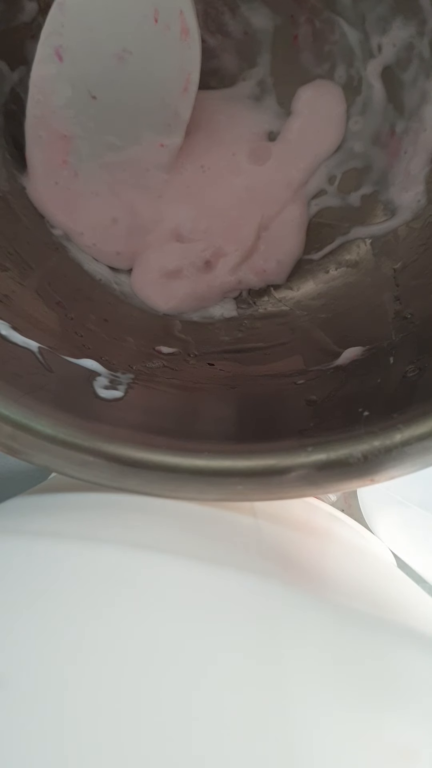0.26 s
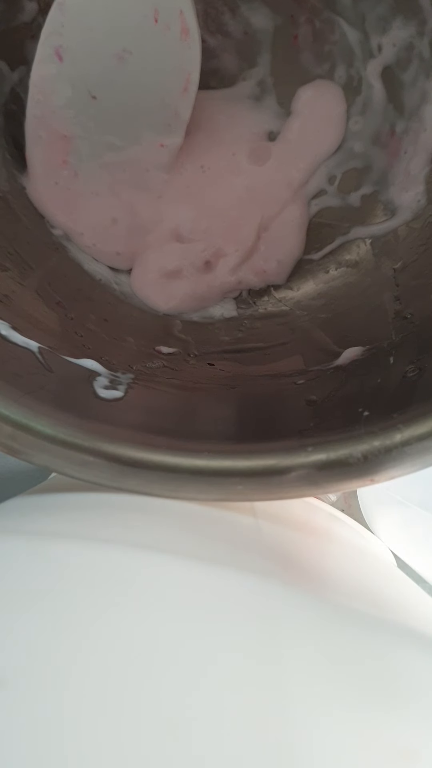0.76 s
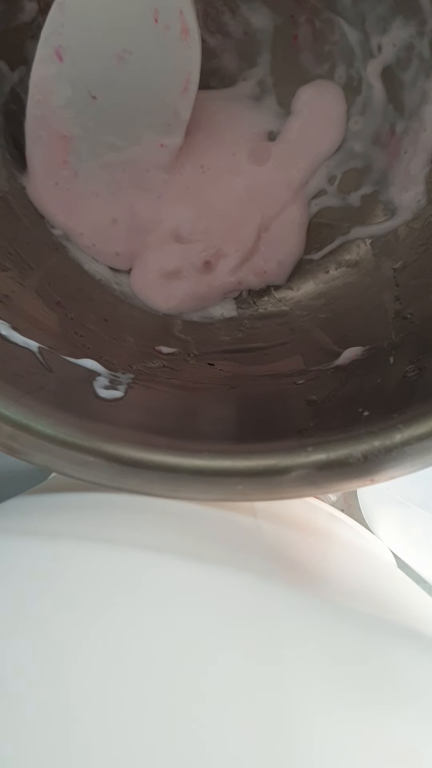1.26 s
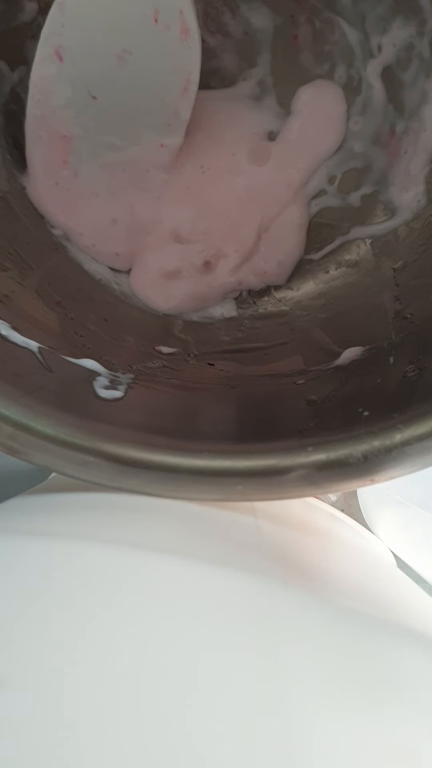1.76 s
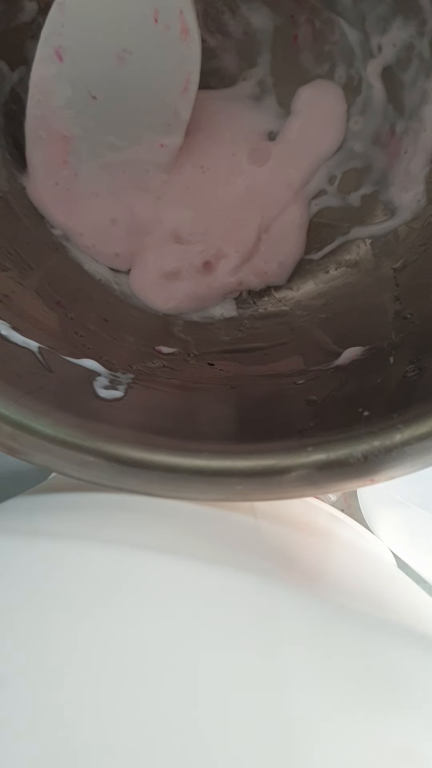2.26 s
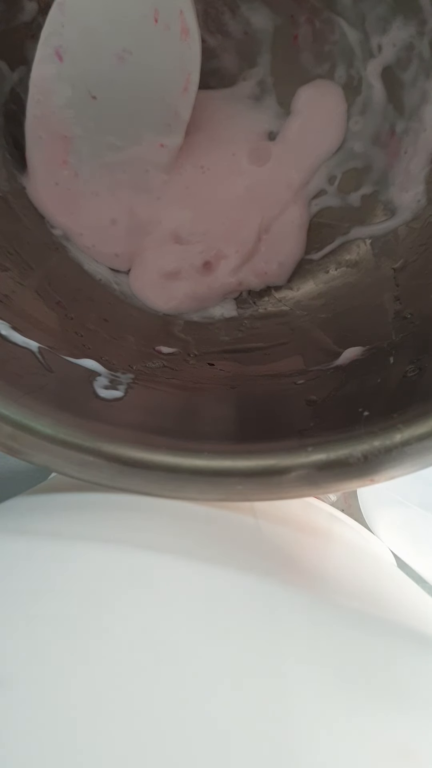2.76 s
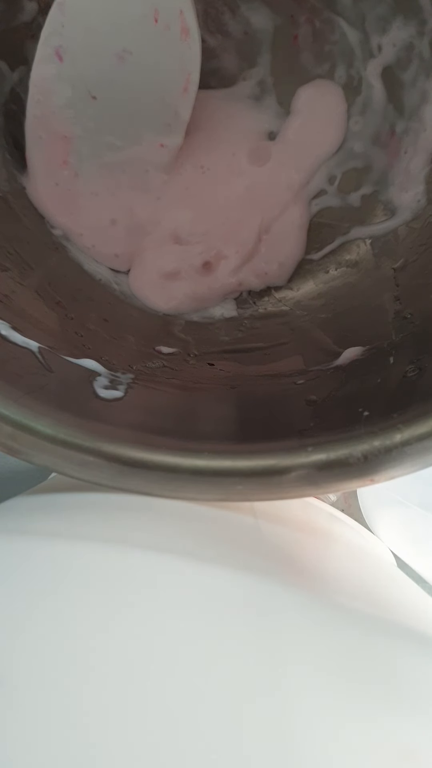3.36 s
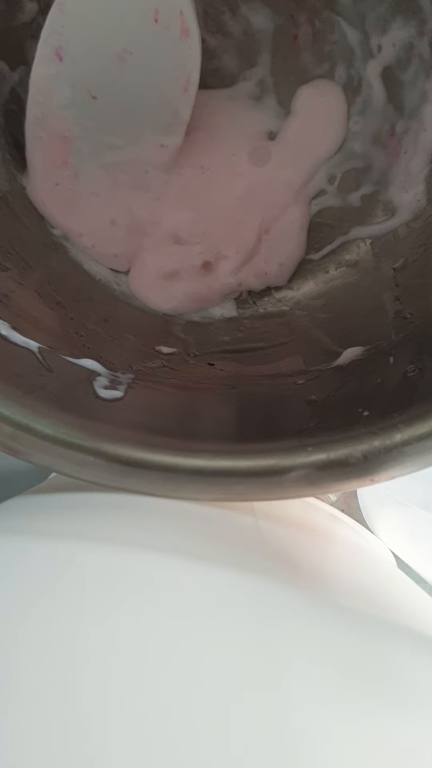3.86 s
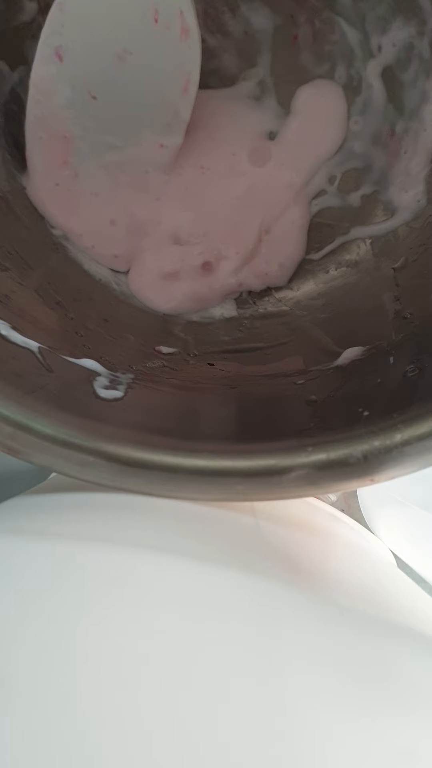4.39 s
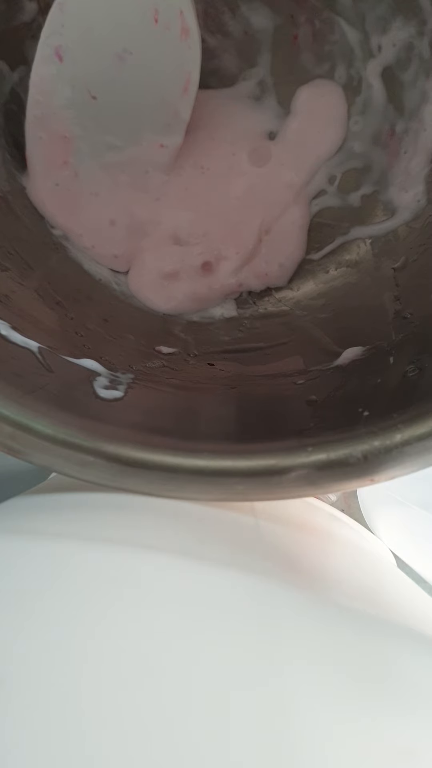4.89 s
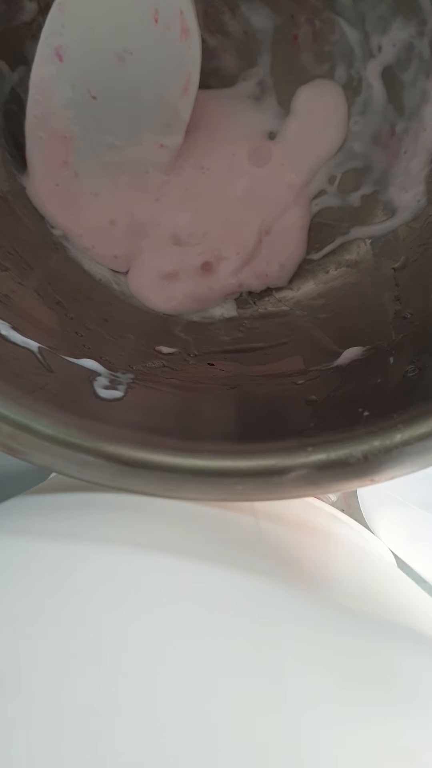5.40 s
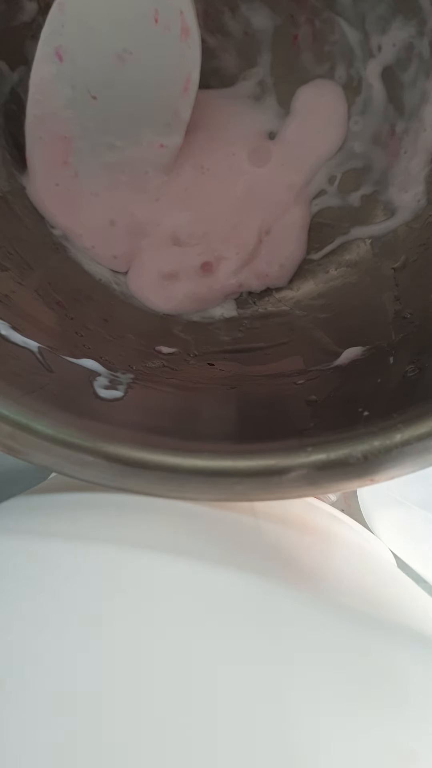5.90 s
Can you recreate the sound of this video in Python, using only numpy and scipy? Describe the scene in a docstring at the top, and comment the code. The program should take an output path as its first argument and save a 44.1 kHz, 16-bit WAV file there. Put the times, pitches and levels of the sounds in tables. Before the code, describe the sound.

Close, bright plastic crinkling and sharp clicks as light containers are handled and bumped on a table in a small, quietly humming room.

```python
"""Rummaging among plastic containers

Hands rummage among small plastic containers on a table, close to the left of a pair of microphones.
Filtered noise bursts make the stiff snaps and hollow knocks, and showers of noise grains the dense fine
crackle and dull shuffle; damped sines make the thumps of the table top. A small room answers as decaying
sparse reflections, and an appliance hums low behind it all as shaped noise with thin wavering tones."""
import sys
import numpy as np
from scipy import signal
from scipy.fft import rfft, irfft, next_fast_len
from scipy.io import wavfile
from scipy.ndimage import uniform_filter1d

SR = 44100
rng = np.random.default_rng(int(sys.argv[2]) if len(sys.argv) > 2 else 0)


def materialize(psi):
    """Save the field psi as 16-bit PCM at rate SR to the path in sys.argv[1].

    A 1-D psi becomes a single channel; in a 2-D psi each row is a channel.
    """
    bounded = np.clip(np.atleast_2d(psi).T, -1, 1)
    quanta = np.round(bounded * 32767).astype(np.int16)
    wavfile.write(sys.argv[1], SR, quanta)


N = 270774  # length [samples]


def gain_of(db):
    """Level law: 20 dB is a tenfold amplitude."""
    return 10 ** (np.asarray(db) / 20)


def evened(x):
    """Power normalization: scales to rms 1."""
    return x / np.sqrt(np.mean(x ** 2) + 1e-20)


def read(points, hz):
    """Interpolation of a table along a logarithmic frequency axis."""
    f, value = np.transpose(points)
    return np.interp(np.log(hz + 1), np.log(f + 1), value)


def colour(x, db_at):
    """Linear filtering: multiplies the spectrum by a gain in dB given as a function of frequency."""
    size = next_fast_len(x.shape[-1])
    gain = gain_of(db_at(np.fft.rfftfreq(size, 1 / SR)))
    return irfft(rfft(x, size) * gain, size)[..., :x.shape[-1]]


def add(mix, s, sound):
    """Superposition: mixes a two-channel sound in at time s."""
    part = mix[:, max(round(s * SR), 0):][:, :sound.shape[1]]
    part += sound[:, :part.shape[1]]


def burst(noise, rise_s, fall_s):
    """Impulsive excitation: noise under a quick rise and an exponential fall."""
    t = np.arange(noise.shape[-1]) / SR
    return noise * (1 - np.exp(-t / rise_s)) * np.exp(-t / fall_s)


def pair(noise, alike):
    """Partial coherence: each microphone faces another side of the source, so the signals agree in part."""
    alike = np.clip(alike, 0, 1)
    right = alike * noise[0] + np.sqrt(1 - alike ** 2) * noise[1]
    return np.array([noise[0], right])


def grains(per_s, spread_db, fall_s, alike):
    """Shot noise: many tiny slips of very unequal size, each a short puff of noise."""
    size_db = spread_db * np.minimum(rng.exponential(1, N), 3.2)
    size = gain_of(size_db) * (rng.random(N) < per_s / SR)
    power = signal.oaconvolve(size ** 2, burst(np.ones(400), 0.00007, fall_s))[:N]
    power /= uniform_filter1d(power, 4000) + 1e-9  # the hands set the level, chance only the fine pattern
    return np.sqrt(abs(power)) * pair(rng.standard_normal((2, N)), alike)


def room_tone():
    """Stationary noise of given spectrum and coherence: low rumble, thin wavering tones and faint hiss."""
    # spectrum of the noise before levelling: (frequency [Hz], gain [dB])
    air = [(15, -32), (30, -3), (65, 13.5), (100, 13), (150, 13), (230, -4), (570, -19.5), (1300, -44),
           (2500, -39), (4500, -9), (7500, -19.5), (16000, -56)]
    # left-right likeness of the noise: (frequency [Hz], coherence [0-1])
    likeness = [(60, .96), (150, .97), (300, .8), (700, .3), (1500, .05)]
    # faint steady tones: (mean frequency [Hz], mean level [dB rms])
    hum = [(118.4, -70), (468.3, -91.5), (780.6, -83.5)]
    air_db = -56  # rms level of the noise
    frames, hz = N // 512 + 5, np.fft.rfftfreq(2048, 1 / SR)
    a, b, c, d = rng.standard_normal((frames, 1025, 4)).T
    same = np.clip(read(likeness, hz), 0, 1)[:, None]
    left = a + 1j * b
    right = same * left + np.sqrt(1 - same ** 2) * (c + 1j * d)
    spectrum = np.array([left, right]) * gain_of(read(air, hz))[:, None]
    noise = signal.istft(spectrum, nperseg=2048, noverlap=1536)[1][:, :N]
    out = gain_of(air_db) * evened(noise)
    for f, db in hum:
        waver = evened(uniform_filter1d(rng.standard_normal(N), 6000))  # moves level and pitch together
        phase = 2 * np.pi * np.cumsum(f * (1 + 0.0042 * waver)) / SR
        out = out + np.sqrt(2) * gain_of(db + 3.7 * waver) * np.sin(phase)
    return out


def room(x):
    """Reverberation: sparse reflections of random sign, each band dying at its own speed."""
    # reverberation time: (frequency [Hz], time to fall by 60 dB [s])
    decay = [(300, 0.56), (1500, 0.3), (4000, 0.34), (10000, 0.22)]
    out = np.zeros_like(x)
    # the hands move about, so the pattern of reflections keeps changing between three
    turn = 2 * np.pi * 2.3 * np.arange(N) / SR
    for k in range(3):
        taps = np.zeros((2, SR // 2))
        at = np.arange(90, SR // 2 - 12, 12)
        at = at + rng.integers(0, 12, (2, len(at)))
        np.put_along_axis(taps, at, rng.choice([-1., 1.], at.shape), 1)
        hz, t, z = signal.stft(taps, SR, nperseg=128)
        swell = 1 - np.exp(-t / 0.0014)  # the walls are some way off
        fall = gain_of(-60 * t / read(decay, hz)[:, None])
        tail = signal.istft(z * swell * fall, SR, nperseg=128)[1]
        tail /= np.linalg.norm(tail, axis=1)[:, None]
        share = np.sqrt(2 / 3) * np.cos(turn + k * np.pi / 3)  # the squared shares sum to 1
        out += signal.fftconvolve(x * share, tail, axes=1)[:, :N]
    return out


def hands():
    """Control envelope: level of the handling in dB, linear between points, at every sample."""
    # handling: (time [s], level of the body of the crackle [dB])
    handling = [(0.0, -54), (0.35, -67), (0.52, -50), (0.74, -68), (0.971, -65.5), (1.028, -48),
                (1.451, -67.5), (1.68, -45.5), (1.79, -55), (1.88, -39), (2.17, -73.5), (2.36, -50),
                (2.48, -60), (2.689, -42), (2.93, -45.5), (2.959, -37.5), (3.072, -58), (3.219, -40),
                (3.4, -48.5), (3.51, -45), (3.68, -56), (3.79, -58), (3.849, -37), (3.99, -54.5),
                (4.021, -46), (4.461, -39.5), (4.53, -55), (4.62, -46.5), (4.83, -69.5), (5.02, -46.5),
                (5.09, -38), (5.29, -38), (5.411, -54.5), (5.53, -41), (5.94, -48), (6.02, -50),
                (6.14, -48)]
    return np.interp(np.arange(N) / SR, *np.transpose(handling))


def shuffle():
    """Shot noise of soft bumps inside the pile, louder as the hands dig in."""
    # dull knocking of the pile before levelling: (frequency [Hz], gain [dB])
    dullness = [(80, -64), (200, 4.5), (400, 7.5), (800, 5), (1500, -1), (2300, -7)]
    base_db, growth = -55, 0.84  # level at a handling of -45 dB, and dB gained per dB of handling
    bumps = grains(per_s=140.0, spread_db=1.5, fall_s=0.0023, alike=0.72)
    level_db = base_db + growth * (uniform_filter1d(hands(), 3000) + 45)
    return gain_of(level_db) * evened(colour(bumps, lambda hz: read(dullness, hz)))


def thumps():
    """Damped modes: the table top answers a landing with a low ring and weaker overtones."""
    # containers landing on the table: (time [s], level of the lowest mode before rise and decay [dB], pitch [Hz])
    landings = [(1.881, -37, 123), (2.358, -40, 153), (2.889, -37, 146.4), (2.929, -39, 144),
                (4.277, -34, 145), (4.365, -27, 117), (4.388, -25.5, 137), (4.44, -32, 120),
                (4.957, -43, 129), (5.101, -34.5, 125), (5.158, -38, 132), (5.236, -33.5, 121),
                (5.409, -30, 155)]
    t60_s = 0.12
    out, t = np.zeros((2, N)), np.arange(SR // 4) / SR
    for s, db, hz in landings:
        ring = np.sin(2 * np.pi * hz * t)
        ring += 0.44 * np.sin(2 * np.pi * 1.9 * hz * t)
        ring += 0.25 * np.sin(2 * np.pi * 1.216 * hz * t)
        envelope = gain_of(db - 60 * t / t60_s) * (1 - np.exp(-t / 0.0098))
        add(out, s - .004, np.tile(envelope * ring, (2, 1)))
    return out


def knocks():
    """Cavity resonance: each bump rings the air and walls of a container for a few cycles."""
    # hollow containers bumping one another: (time [s], peak level [dB], pitch [Hz])
    bumps = [(0.774, -43, 580), (1.034, -43.5, 437), (1.113, -49, 674), (1.152, -39.5, 540),
             (1.667, -38, 637), (1.875, -32.5, 517), (2.351, -40.5, 380), (2.736, -62, 430),
             (3.141, -37, 935), (3.474, -44, 850), (4.008, -40, 829), (4.187, -41.5, 400),
             (4.233, -45, 345), (4.281, -42.5, 328), (4.399, -37, 403), (4.479, -35, 630),
             (5.152, -35, 775), (6.064, -40, 610)]
    out = np.zeros((2, N))
    for (s, db, hz), noise in zip(bumps, rng.standard_normal((len(bumps), 2, 1500))):
        hollow = signal.iirpeak(hz, .9, SR)
        blow = burst(pair(noise, 0.75), 0.00073, 0.006)
        ring = signal.lfilter(*hollow, signal.lfilter(*hollow, blow))
        add(out, s - .001, gain_of(db) * ring / abs(ring).max(1)[:, None])
    return out


def crumples():
    """Amplitude envelope: each squeeze swells and fades as a smooth squared-cosine arch."""
    # thin plastic squeezed for a moment: (middle [s], length [s], peak of the arch [dB])
    squeezes = [(0.524, .08, -53), (1.132, 0.045, -37), (1.299, 0.049, -36.5), (1.681, 0.1, -37),
                (1.878, 0.2, -37.5), (2.682, 0.073, -48), (3.223, 0.059, -32.5), (3.504, .07, -40),
                (3.92, .1, -31.5), (5.058, 0.11, -37), (5.32, 0.11, -35), (5.524, 0.11, -36)]
    middle, length, db = np.transpose(squeezes)[..., None]
    t = np.arange(0, N / SR, .002)
    arches = gain_of(db) * np.cos(np.pi * np.clip((t - middle) / length, -.5, .5)) ** 2
    return np.interp(np.arange(N) / SR, t, arches.sum(0))


def crackle():
    """Stick-slip shot noise of creasing plastic: harder handling packs the slips closer."""
    # spectrum of the crinkle before levelling: (frequency [Hz], gain [dB])
    crinkle = [(200, -31), (900, -12), (1300, -6.5), (2000, -2), (2500, 1), (7200, -2), (9100, -7),
               (12000, -4.5), (15200, -6), (16500, -52)]
    crisp_db, crisp_growth = -42, 0.67  # level at a handling of -44.5 dB, and dB gained per dB of handling
    per_s = 600. * gain_of(.8 * (hands() + 45.5))
    slips = grains(per_s, spread_db=6.5, fall_s=0.0016, alike=0.05)
    fine = colour(slips, lambda hz: read(crinkle, hz))
    crisp = colour(fine, lambda hz: read([(5500, -12.5), (9000, 2.5)], hz))
    steady = gain_of(crisp_db + crisp_growth * (hands() + 44.5))
    crisp_gain = np.hypot(steady, crumples())  # the crisp top flares in crumples
    return gain_of(hands()) * evened(fine - crisp) + crisp_gain * evened(crisp)


def small_snaps():
    """Random point process: chance snaps, more of them and louder where the handling is harder."""
    count, low_hz, high_hz = 70, 2380, 7000
    ring_above_db, edge_above_db, scatter_db = 17.5, 10.5, 5  # peaks above the handling level, and spread
    when, high, a, b = rng.random((count, 4)).T
    busy = np.cumsum(gain_of(0.6 * hands()))
    at = np.searchsorted(busy, when * busy[-1]).clip(0, N - 1)
    ring_db = hands()[at] + ring_above_db + scatter_db * (2 * a - 1)
    edge_db = hands()[at] + edge_above_db + scatter_db * (2 * b - 1)
    return list(zip(at / SR, ring_db, low_hz * (high_hz / low_hz) ** high, edge_db))


def snaps():
    """Buckling: a millisecond of slips rings the panel, and the crease adds a sharp edge."""
    # clear snaps, peaks before panning:
    # (time [s], panel ring peak [dB], panel pitch [Hz], sharp edge peak [dB])
    clear = [(0.0472, -23.5, 4060, -16), (0.1105, -40, 6980, -20), (0.116, -17.5, 5400, -20),
             (0.1758, -21.5, 3060, -26), (0.2391, -19, 5900, -29), (0.3224, -20, 3970, -40),
             (0.3686, -28, 3450, -30), (0.3882, -31, 5210, -23.5), (0.44, -43, 3090, -36),
             (0.4566, -24, 5000, -21), (0.5001, -32, 4000, -17), (0.5245, -24, 3920, -12.5),
             (0.5474, -23.5, 5340, -18), (0.5796, -23.5, 6550, -19), (0.6495, -24, 4600, -34),
             (0.7514, -22.5, 6550, -20), (0.7762, -20, 3700, -9), (0.8259, -15.5, 2830, -17),
             (0.8397, -21.5, 3700, -16), (0.9773, -28, 3770, -42), (1.0116, -19, 4470, -12.5),
             (1.0345, -15, 5530, -14), (1.1159, -33, 6980, -12.5), (1.1885, -25.5, 2410, -15),
             (1.2123, -23, 3750, -30), (1.2331, -24.5, 3190, -30), (1.2459, -22.5, 6420, -21),
             (1.2762, -23, 4310, -15), (1.2918, -18, 5200, -22), (1.3015, -25, 6980, -23),
             (1.3591, -28.5, 3240, -17.5), (1.4656, -15.5, 5500, -21.5), (1.4861, -20.5, 3130, -22),
             (1.5158, -19.5, 5160, -13), (1.5662, -21.5, 3550, -25), (1.5934, -20, 4500, -19),
             (1.5995, -30, 5000, -15), (1.6262, -27, 3250, -17), (1.6733, -17.5, 2720, -21),
             (1.7246, -23.5, 5700, -30), (1.7697, -27.5, 2870, -31), (1.8103, -19.5, 5600, -13.5),
             (1.8335, -20, 3420, -9), (1.8765, -23.5, 2500, -5.5), (1.8931, -16.5, 6800, -25),
             (1.9232, -24, 4950, -11), (2.0126, -34.5, 3490, -21), (2.0479, -31.5, 3100, -29),
             (2.2137, -34, 6030, -40), (2.2356, -30, 6980, -29), (2.2693, -29, 6900, -23),
             (2.3536, -18, 2930, -13.5), (2.4196, -24, 5300, -22), (2.4865, -27, 5100, -20),
             (2.5492, -21.5, 3440, -12), (2.599, -23, 6980, -18), (2.6302, -17, 6980, -17),
             (2.6756, -22, 4520, -9), (2.6903, -16.5, 5030, -11), (2.7689, -26, 4820, -13.5),
             (2.8073, -17, 7000, -17), (2.8593, -18, 5500, -12.5), (2.8708, -22, 2350, -22),
             (2.8817, -22, 5500, -12), (2.9393, -22, 6980, -11.5), (3.0381, -25.5, 5300, -24),
             (3.0946, -24, 5380, -10), (3.1074, -22, 3280, -31), (3.1429, -28, 1900, -37),
             (3.2066, -12.5, 3830, -12), (3.3416, -24.5, 4390, -27), (3.4316, -23, 6900, -12.5),
             (3.4899, -26.5, 2110, -17), (3.5016, -22, 4350, -13.5), (3.5249, -21, 4230, -12.5),
             (3.5738, -46, 3400, -17), (3.5869, -20, 3620, -15), (3.7015, -20.5, 6800, -23),
             (3.7552, -24.5, 4150, -36), (3.8374, -19, 6740, -14), (3.8961, -19.5, 2500, -24),
             (3.9167, -22, 6590, -17), (4.0026, -20, 3680, -16), (4.0522, -19.5, 3920, -17),
             (4.0642, -20, 4350, -21), (4.117, -24, 3450, -23), (4.1369, -28, 4390, -16),
             (4.1528, -19, 4340, -16), (4.2129, -24, 6550, -18), (4.2424, -23, 3420, -12.5),
             (4.2858, -23.5, 3600, -19), (4.3309, -32, 6980, -18), (4.3541, -32, 3400, -14.5),
             (4.4006, -13, 1940, -15), (4.4434, -43, 6550, -13), (4.5468, -23.5, 3960, -18),
             (4.5844, -23, 3170, -23), (4.6037, -20.5, 6850, -21), (4.751, -28, 5370, -28),
             (4.8446, -33.5, 6980, -35), (4.8712, -28, 3560, -22.5), (4.8888, -23.5, 3720, -26),
             (4.9477, -27.5, 6980, -34), (4.9921, -32, 3630, -29), (5.0424, -19, 4440, -27),
             (5.1517, -19, 3800, -19), (5.1982, -33, 5860, -27), (5.2693, -34, 5170, -16),
             (5.2874, -15, 5810, -18), (5.3266, -16, 3500, -12.5), (5.4231, -26, 3880, -15.5),
             (5.6925, -28, 3650, -21), (5.7112, -23.5, 2670, -17), (5.749, -17, 2940, -29),
             (5.7642, -25, 5470, -23), (5.8073, -26.5, 5560, -12.5), (5.9464, -33, 3960, -30),
             (5.9698, -21, 3770, -19), (6.0355, -23, 3870, -19), (6.0522, -28, 4650, -13)]
    # where the hands work: (time [s], left minus right [dB])
    side = [(0, 3.5), (1.9, 6), (3.8, 5), (6.14, 2.5)]
    out = np.zeros((2, N))
    rows = list(clear) + small_snaps()
    noise = rng.standard_normal((len(rows), 4, 2, 2, 512))
    chance = rng.random((len(rows), 2, 4))
    sides = np.interp([row[0] for row in rows], *np.transpose(side))
    sides = sides + rng.standard_normal(len(rows))  # scatter of 1 dB
    sharp = signal.butter(N=3, Wn=6800., btype="high", fs=SR)
    for (s, ring_db, hz, edge_db), pan_db, slips, (when, size) in zip(rows, sides, noise, chance):
        panel = signal.iirpeak(hz, 1.3, SR)
        pan = np.array([[pan_db], [-pan_db]]) / 2
        # three weaker slips surround the main one, more strongly when it is loud
        weaker_db = -11 - 8 * size + 0.097 * (max(ring_db, edge_db) + 20)
        for k, (a, b) in enumerate(slips):
            ring = burst(pair(a, 0.4), 0.00015, 0.0007)
            ring = signal.lfilter(*panel, signal.lfilter(*panel, ring))
            edge = signal.lfilter(*sharp, burst(pair(b, 0.3), 0.0001, 0.0008))
            edge = colour(edge, lambda hz: read([(7500, 0.5), (9200, -1.5), (12000, 4.5)], hz))
            sound = gain_of(ring_db) * ring / abs(ring).max(1)[:, None]
            sound += gain_of(edge_db) * edge / abs(edge).max(1)[:, None]
            late, db = (-.003 + 0.009 * when[k], weaker_db[k]) if k else (0, 0)
            add(out, s + late, gain_of(db + pan) * sound)
    return out


def scene():
    """Interaural-style level and time differences: the handling is louder left and later right."""
    # balance of all but snaps and thumps: (frequency [Hz], left minus right [dB])
    balance = [(60, -2), (150, 0.5), (380, 4.5), (950, 4), (2380, 2.5), (5980, 2), (15000, 7.0)]
    lag, room_db = 16, -6  # delay of the right microphone [samples], gain of the reflections [dB]
    half = np.array([[.5], [-.5]])
    pile = colour(crackle() + shuffle() + knocks(), lambda hz: half * read(balance, hz))
    near = snaps() + pile
    near = np.array([near[0], np.roll(near[1], lag)])
    still = colour(room_tone(), lambda hz: half * read(balance, hz))
    return near + gain_of(room_db) * room(near) + thumps() + still


def record(dry):
    """Band limiting: a steep step down at the very top, then a low-pass filter."""
    roll_hz, edge_hz = 15850, 16900
    rolled = colour(dry, lambda hz: read([(roll_hz, 0), (roll_hz + 120, -17)], hz))
    low_pass = signal.firwin(511, edge_hz, window=("kaiser", 9), fs=SR)
    return signal.oaconvolve(rolled, low_pass[None], "same")


dry = scene()
out = record(dry)
materialize(out)
```